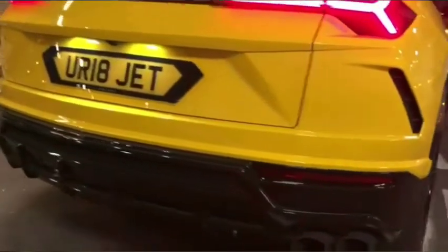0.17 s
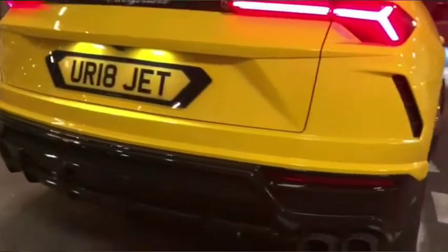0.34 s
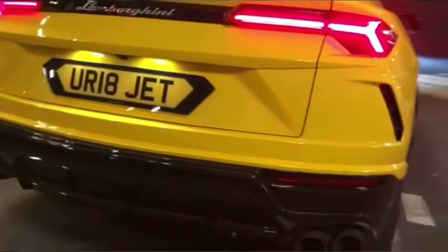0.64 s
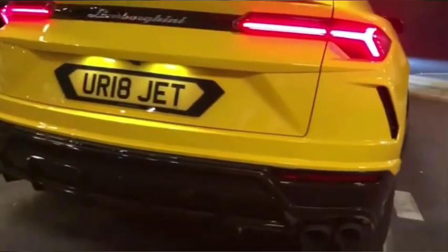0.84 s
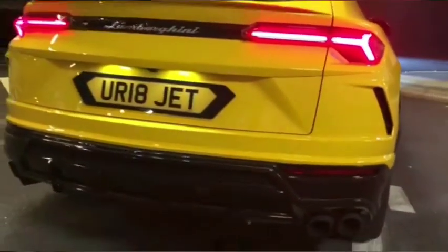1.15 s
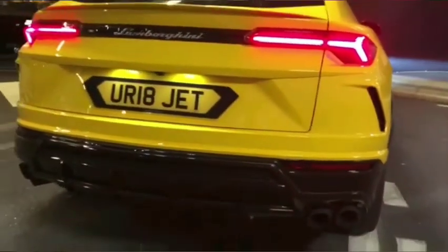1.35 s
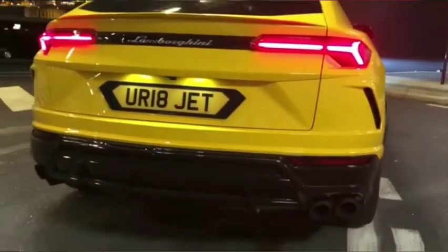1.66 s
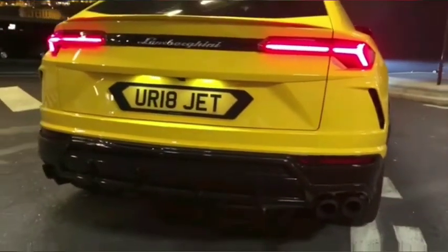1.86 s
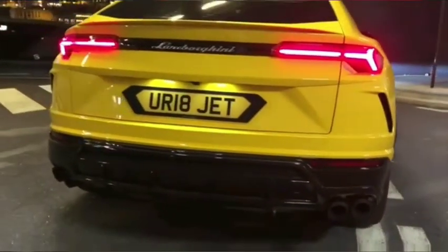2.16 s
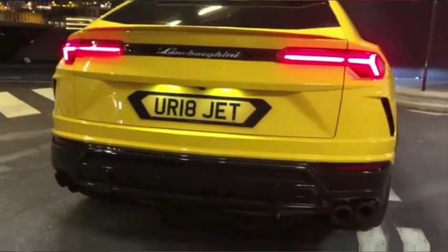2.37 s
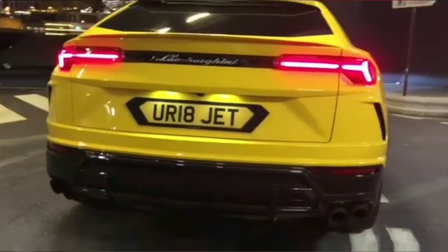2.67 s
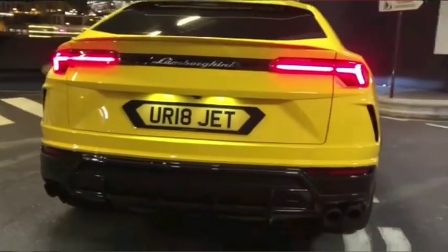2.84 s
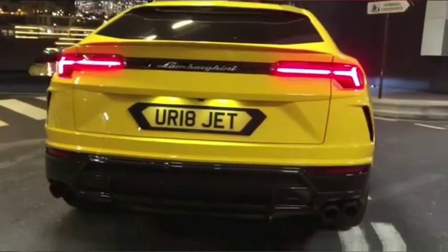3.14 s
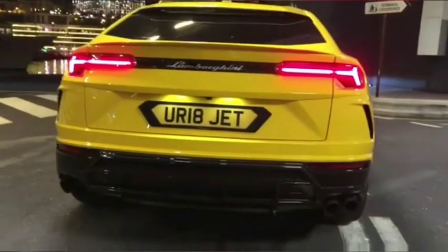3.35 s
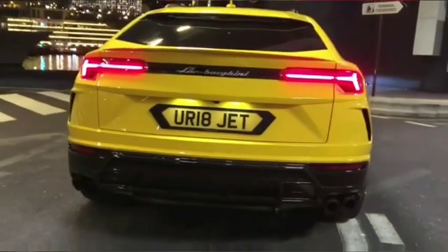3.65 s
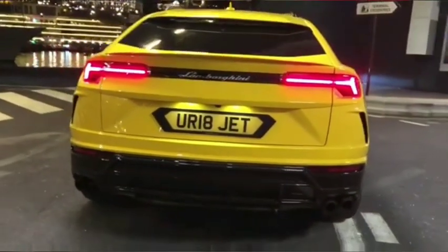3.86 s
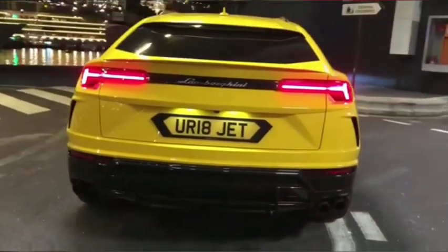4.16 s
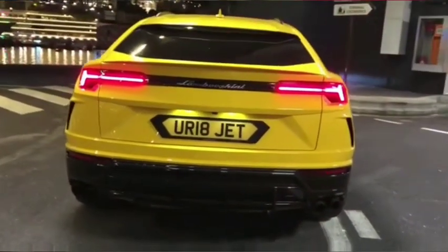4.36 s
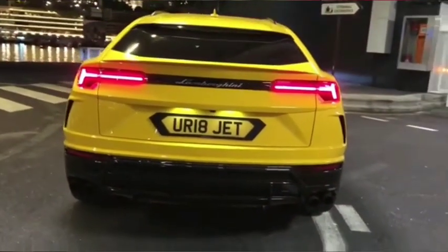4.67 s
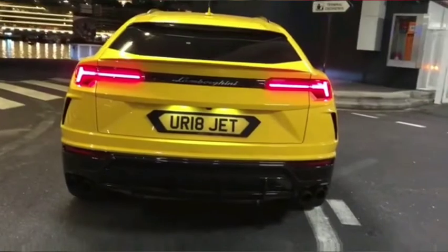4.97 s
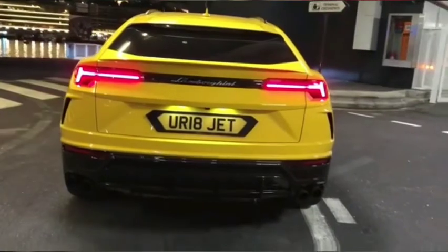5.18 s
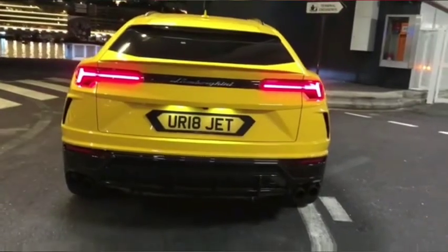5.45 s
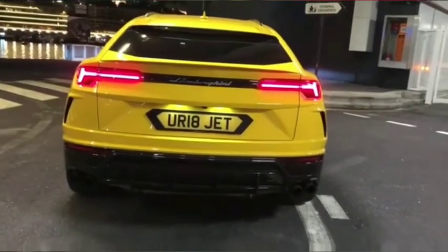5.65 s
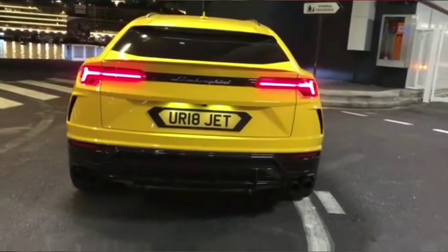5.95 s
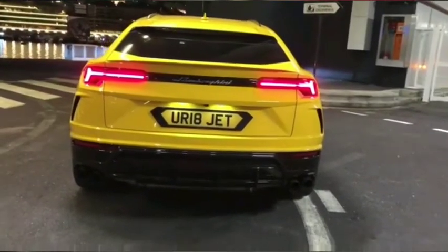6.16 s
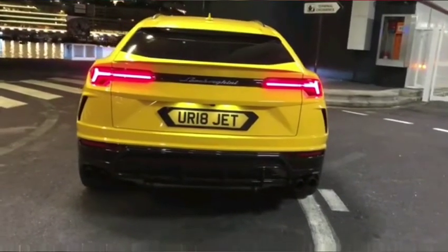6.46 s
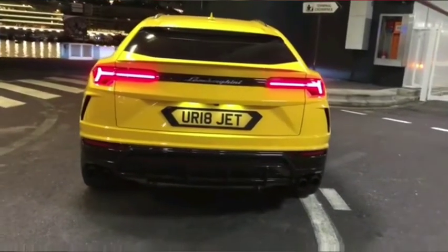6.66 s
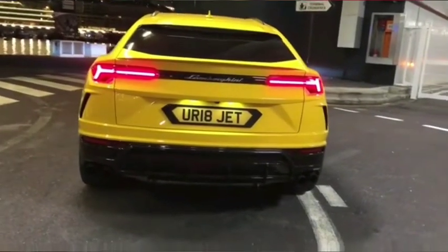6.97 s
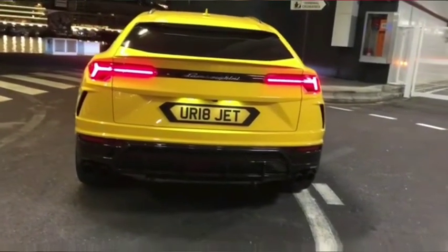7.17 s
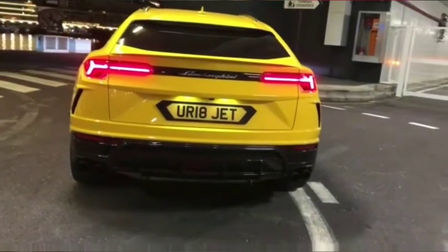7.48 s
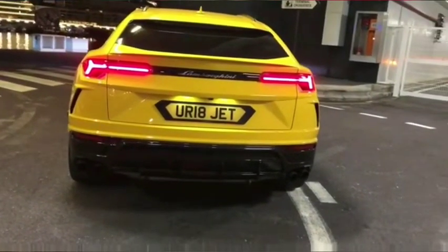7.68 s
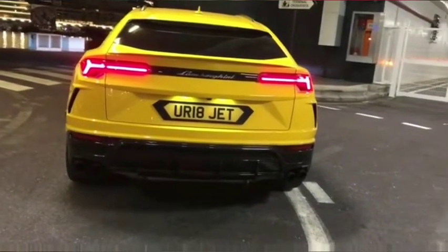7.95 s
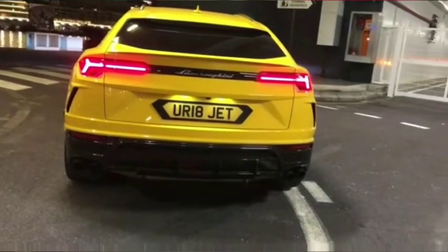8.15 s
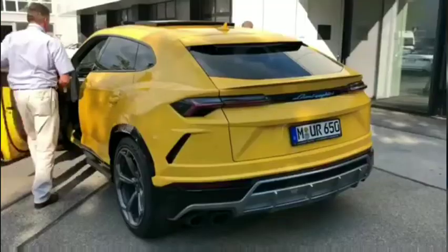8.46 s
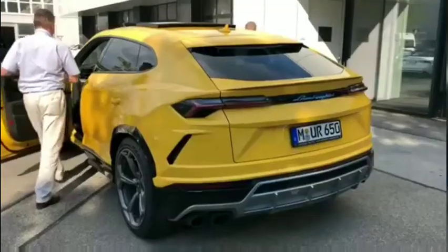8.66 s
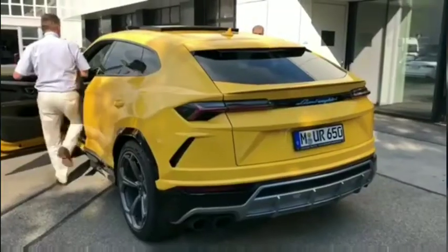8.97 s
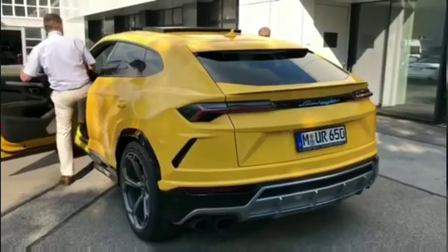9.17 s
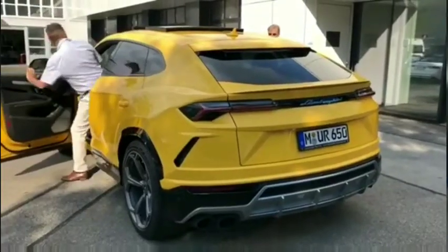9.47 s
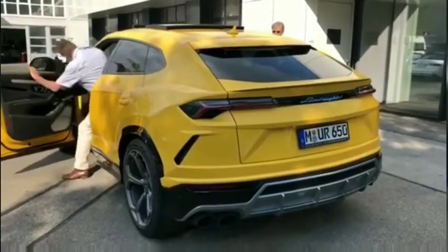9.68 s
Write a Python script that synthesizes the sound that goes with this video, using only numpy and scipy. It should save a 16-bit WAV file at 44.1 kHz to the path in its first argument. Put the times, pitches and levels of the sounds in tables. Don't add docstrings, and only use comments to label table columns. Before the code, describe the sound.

A V8 exhaust note falls from an earlier rev, then five short throttle blips growl upward, separated by burbling overruns. Backfires crackle densely after the first, third and fourth; the second ends in a sharp snap and a big airy blow-off. Nearby walls and road return short echoes to the close, overloaded microphone. Abrupt cut, brief gap, then soft distant traffic hum, light scuffs and faint cloth.

```python
import sys
import numpy as np
from scipy import signal
from scipy.fft import rfft, irfft
from scipy.io import wavfile
from scipy.ndimage import uniform_filter1d

SR = 44100
rng = np.random.default_rng(int(sys.argv[2]) if len(sys.argv) > 2 else 0)


def waveform_to_disk(signal):
    frames = np.transpose(np.atleast_2d(signal))
    scaled = np.clip(frames, -1, 1) * 32767
    samples = np.round(scaled).astype(np.int16)
    wavfile.write(sys.argv[1], SR, samples)


def invert_db(x):
    u = np.asarray(x, float) / 20
    return 10 ** u


N = 433062

# f/Hz, width/Hz, level/dB
TIP = [(1060, 151, 3), (1295, 217, -1.5)]
# f/Hz, width/Hz, level/dB
SILENCER = [(59.7, 16.7, 2), (107, 39.7, 0), (146.7, 44.4, 1.5), (210.5, 61.6, -1), (289, 46, -5.5),
            (346.3, 89, -11)]
# f/Hz, width/Hz, level/dB
PIPE = [(467, 120, -0.5), (655, 131, 1), (795, 156, -0.5)]
# f/Hz, width/Hz, level/dB
RIM = [(1470, 590, 2), (2210, 760, 1), (3320, 1020, -4.5), (4200, 1130, -14)]
# f/Hz, level/dB
BOOM = [(85, -2.5), (110, -0.5), (128, 1.5), (138, 4.5), (148, 3.5), (162, -2.5), (190, -7)]
# down t/s, up t/s, peak gas flow level/dB, firing tone level/dB, growl over flow level/dB
BLIPS = [
    (.875, 1.158, -18.5, -13.5, 3),
    (2.695, 3.057, -19.5, -13, -2.5),
    (4.422, 4.72, -28.5, -19.5, 0.5),
    (5.803, 6.126, -23, -16, -1),
    (7.857, 8.15, -22, -11.5, -8.5),
]
RELEASE_S = 0.12
VENT_FALL_DB_PER_S = -89.5


def evened(x):
    return x / np.sqrt(np.mean(x ** 2) + 1e-20)


def steady(x):
    return x / np.sqrt(abs(uniform_filter1d(x ** 2, 8192)) + 1e-12)


def read(points, hz):
    f, value = np.transpose(points)
    return np.interp(np.log(hz + 1), np.log(f + 1), value)


def moments():
    return np.arange(0, N, 32) / SR


def line(points):
    return np.interp(moments(), *np.transpose(sorted(points)))


def fine(control):
    return np.interp(np.arange(N) / SR, moments(), control)


def together(*levels_db):
    return 10 * np.log10(sum(invert_db(db) ** 2 for db in levels_db))


def waver(db, hz):
    steps = rng.standard_normal(400)
    return invert_db(db * np.interp(np.arange(N) / SR * hz, np.arange(len(steps)), steps))


def ring(x, modes):
    out = 0
    for k, (hz, width, db) in enumerate(modes):
        out = out + (-1) ** k * invert_db(db) * signal.lfilter(*signal.iirpeak(hz, hz / width, SR), x)
    return out


def focus(x, modes, hz, width):
    return ring(ring(x, modes), [(hz, width, 0)])


def noise(spectrum, patchy_db, flicker_db):
    frames, hz = N // 128 + 5, np.fft.rfftfreq(512, 1 / SR)
    a, b, patches = rng.standard_normal((frames, 257, 3)).T
    patches = uniform_filter1d(patches, size=8, axis=0)
    patches = evened(uniform_filter1d(patches, size=16, axis=1))
    flicker = evened(uniform_filter1d(rng.standard_normal(frames), size=5))
    level_db = read(spectrum, hz)[:, None] + patchy_db * patches + flicker_db * flicker
    z = (a + 1j * b) * invert_db(level_db)
    return evened(signal.istft(z, nperseg=512, noverlap=384)[1][:N])


def bursts(events, rise_s, t60_s):
    t = np.arange(4000) / SR
    out = np.zeros(N + len(t))
    for s, db, hz in events:
        shape = invert_db(db - 60 * t / t60_s) * np.minimum(t / rise_s, 1)
        spray = focus(rng.standard_normal(len(t)), [(hz, 900, 3), (9000, 8000, -2)], 5900, 9000)
        out[round(s * SR):][:len(t)] += 0.79 * shape * spray
    return out[:N]


def street():
    # f/Hz, level/dB per Hz
    hum_spectrum = [(15, -52), (25, -25), (71, 2.5), (234, -9), (273, -8.5), (437, -16), (1870, -20.5),
                    (3070, -32), (3500, -29), (3780, -34.5), (9390, -50.5), (10700, -53), (12500, -60),
                    (16200, -94), (22000, -120)]
    hz = np.fft.rfftfreq(N, 1 / SR)
    hum = evened(irfft(rfft(rng.standard_normal(N)) * invert_db(read(hum_spectrum, hz)), N))
    swell = evened(uniform_filter1d(rng.standard_normal(N), size=4000))
    return invert_db(-42.5) * invert_db(.7 * swell) * hum


def rustle():
    centre_s, width_s = 9.3, 0.47
    swell = np.exp(-((np.arange(N) / SR - centre_s) / width_s) ** 2)
    return invert_db(-64) * swell * noise([(2000, -30), (3500, 4), (7000, -6), (11000, -10)], 3.0, 2.5)


def scuffs():
    # t/s, level/dB, f/Hz
    steps = [
        (8.872, -46, 4300),
        (9.07, -56, 3600),
        (9.125, -49, 3480),
        (9.148, -42, 3610),
        (9.319, -42, 3510),
        (9.385, -48, 3590),
    ]
    return bursts(steps, rise_s=.006, t60_s=0.11)


def walls(x):
    # f/Hz, t60/s
    decay = [(60, 0.3), (300, 0.55), (1200, 0.29), (4000, 0.17), (14000, 0.42)]
    taps = np.zeros(SR // 2)
    at = np.arange(500, SR // 2 - 20, 20)
    taps[at + rng.integers(0, 20, len(at))] = rng.choice([-1., 1.], len(at))
    hz, t, z = signal.stft(taps, SR, nperseg=256)
    tail = signal.istft(z * invert_db(-60 * t / read(decay, hz)[:, None]), SR, nperseg=256)[1]
    return signal.fftconvolve(x, tail / np.linalg.norm(tail))[:N]


def hollow(x):
    # f/Hz, width/Hz, level/dB
    near_colour = [(465, 100, -1), (804, 140, -3), (235, 60, -6), (72, 40, -6)]
    fade_s = 4.6
    share = np.clip(0.71 * (1 - (np.arange(N) / SR / fade_s) ** 2), 0, 1)
    return x - share * ring(x, near_colour)


def ticks():
    # t/s, level/dB, f/Hz
    taps = [
        (2.29, -28.5, 6300),
        (2.302, -20, 4700),
        (3.1853, -16, 4070),
        (3.1995, -23, 3760),
        (3.208, -3, 3980),
        (4.102, -36, 4240),
        (5.0313, -29, 3560),
        (5.6001, -36, 3670),
        (6.5864, -17, 4200),
        (7.205, -24, 5700),
    ]
    # t/s, length/s, f/Hz, level/dB
    chirp = (3.192, .019, 3080, -15)
    out = bursts(taps, rise_s=0.0028, t60_s=0.034)
    s, length, hz, db = chirp
    t = np.arange(4000) / SR
    whistle = (t < length) * (t / length) ** 2 * np.sin(2 * np.pi * hz * t)
    out[round(s * SR):][:len(t)] += invert_db(db) * whistle
    return out


def backfires():
    # t/s, crack level/dB, thump level/dB, snap level/dB
    backfire_pops = [(1.221, -29, -36, -32.5), (1.304, 1, -17.5, -8), (1.31, -6, -4.5, -11), (1.333, -4, -10, -13),
                     (1.362, -8.5, -7.5, -16.5), (1.448, -4.5, -14, -19), (1.487, -5.5, -7.5, -11),
                     (1.524, -11.5, -7, -16), (1.613, -13, -15, -33.5), (1.631, -16, -5, -20),
                     (1.726, -34, -16, -22), (1.731, -4, -8.5, -35), (1.755, -16.5, -12, -38),
                     (1.777, -16, -10.5, -47), (1.869, -9, -9.5, -28.5), (1.95, -22, -11, -31.5),
                     (2.29, -23, -15, -36), (2.347, -17, -18, -35.5),
                     (2.706, -10.5, -13, -26),
        (3.139, -18, -25, -32),
        (3.211, -8, -34, -14),
        (3.374, -19.5, -16, -26),
        (3.529, -16, -16, -30),
        (3.676, -38, -19, -37),
                     (4.433, -27, -35, -50), (4.848, -14, -9, -14.5), (4.872, -6, -29, -31), (4.883, -6, -26, -42),
              (4.901, -18, -18, -38), (5.002, -10.5, -8.5, -23.5), (5.049, -11.5, -13, -30),
              (5.063, -13.5, -14, -38), (5.17, -8.5, -10, -23), (5.207, -13, -10.5, -31),
              (5.233, -15.5, -19, -45), (5.382, -11, -11.5, -26), (5.414, -31, -11, -37),
              (5.468, -10, -10, -26.5),
                     (5.798, -23, -19, -33), (6.264, -4, -13, -16), (6.296, -7.5, -20, -29),
              (6.317, -9.5, -5, -21.5), (6.353, -36, -14.5, -41), (6.401, -16, -12.5, -37),
              (6.427, -5, -7, -18), (6.481, -8.5, -9, -18.5), (6.508, -5, -21, -43), (6.556, -7, -6, -20),
              (6.589, -8.5, -7.5, -23.5), (6.621, -7.5, -15, -28), (6.653, -7.5, -14.5, -28.5),
              (6.696, -9.5, -6, -23), (6.756, -10, -3, -23), (6.78, -6.5, -12, -19), (7.394, -27, -41, -50),
              (7.493, -16.5, -24, -37), (7.547, -23, -20, -38),
                     (7.877, -14, -17, -31),
        (7.971, -13, -33, -38),
        (8.124, -3, -27, -33),
        (8.155, -9, -37, -28),
        (8.275, -9, -7, -24),
        (8.29, -5.5, -13, -26.5),
    ]
    # t/s, thump level/dB
    thuds = [
        (2.45, -17.5),
        (3.085, -9.5),
        (3.43, -20),
        (3.77, -22.5),
        (4.21, -30),
        (7.6, -23),
    ]
    muffled = [(at, db - 18, db, db - 34.5) for at, db in thuds]
    pops = backfire_pops + muffled
    s, crack_db, thump_db, snap_db = np.transpose(pops)
    fizz_db = -29 + 0.49 * snap_db

    t = np.arange(4500) / SR
    a, b, c, d = rng.standard_normal((len(s), 4, len(t))).transpose(1, 0, 2)
    ragged = invert_db(3.6 * evened(uniform_filter1d(d, size=130)))
    shock = a * (invert_db(-60 * t / 0.011) + 0.24 * ragged * invert_db(-60 * t / 0.13))
    crack = focus(shock, TIP, 1200, 1500) - invert_db(-3.5) * focus(shock, PIPE, 590, 1040)
    snap = ring(c * (invert_db(-60 * t / 0.025) + 0.16 * ragged * invert_db(-60 * t / 0.092)), RIM)
    pulse = (1 - t / 0.0038) * np.exp(-t / 0.0022)
    blow = pulse + .5 * uniform_filter1d(b, size=30) * invert_db(-60 * t / 0.6)
    thump = ring(blow, SILENCER) * invert_db(-60 * t / 0.17)
    hiss = np.diff(d, prepend=0) * (invert_db(-60 * t / 0.068) + .2 * invert_db(-60 * t / 0.16))
    fizz = ring(hiss, [(6660, 2500, 0)])

    layers = ((crack_db, crack), (thump_db + 6.5, thump), (fizz_db + 4, fizz), (snap_db + 5.0, snap))
    bangs = sum(invert_db(db)[:, None] * x / abs(x).max(axis=1, keepdims=True) for db, x in layers)
    out = np.zeros(N + len(t))
    for at, bang in zip(s, bangs):
        out[round(at * SR):][:len(t)] += bang
    return out[:N]


def throttle():
    t = np.arange(N) / SR
    opened = sum((t > down) & (t < up + RELEASE_S) for down, up, *_ in BLIPS)
    return .15 + .85 * uniform_filter1d(opened * 1., size=1500)


def vent(s, db, fall_db_per_s):
    since = moments() - s - 0.05
    return db + np.maximum(np.where(since < 0, 250, fall_db_per_s) * since, -90)


def pedal():
    jump_s, build_s, shut, boost_db, coast_growl_db = 0.05, 0.25, -80, 3, 0
    stab, tone, lump, boost, growl = [], [], [], [], []
    for down, up, peak, tone_db, growl_db in BLIPS:
        end, leapt, built = up + RELEASE_S, down + jump_s, down + build_s
        thud = .6 * (peak + 22)
        stab += [(down - .02, shut), (down, peak - 18), (leapt, peak - 8), (built, peak), (up, peak - 1),
                 (end, peak - 16), (end + .03, shut)]
        tone += [(down - .02, shut), (down, tone_db - 5), (leapt, tone_db - 3), (down + 0.21, tone_db),
                 (up + 0.046, tone_db), (up + 0.048, tone_db - 5.5), (end + 0.022, tone_db - 8.5),
                 (end + 0.097, shut)]
        lump += [(down - .02, shut), (down, thud), (up - .09, thud), (up, thud + 10.5), (end, thud - 1),
                 (end + .03, shut)]
        boost += [(down, 0), (leapt, -boost_db), (built, boost_db), (up + .02, -1), (end, 0)]
        growl += [(down, coast_growl_db), (leapt, growl_db - 7), (built, growl_db), (up, growl_db),
                  (end + 0.024, coast_growl_db)]
    return map(line, (stab, tone, lump, boost, growl))


def overrun():
    # start t/s, gas flow level/dB, calm from t/s, calm flow level/dB, unburnt fuel level/dB
    shut = [
        (0.0, -31.5, 0.49, -35.5, 11.5),
        (1.3, -27.5, 2.49, -40, 15.5),
        (3.5, -35, 3.88, -43.5, 11),
        (4.86, -34, 5.5, -39.5, 16.5),
        (6.28, -26, 7.03, -37.5, 15.5),
    ]
    coast, fuel = [], []
    for (start, flow_db, calm, calm_db, fuel_db), (down, *_) in zip(shut, BLIPS):
        coast += [(start - .03, flow_db - 7.5), (start, flow_db), (calm, calm_db),
                  (down, calm_db - 5 * (down - calm))]
        fuel += [(start, fuel_db - 1.5), (start + 0.17, fuel_db), (calm, fuel_db), (down, fuel_db + 3.5)]
    return line(coast), line(fuel)


def levels(hz):
    # t/s, level/dB
    puffs = [
        (1.33, -36),
        (2.275, -41.5),
        (2.4, -53),
        (3.7, -51.5),
        (5.77, -44),
        (8.25, -32.5),
    ]
    # t/s, level/dB
    surges = [
        (.93, -16),
        (1.6, -7.5),
        (2.69, -14),
        (3.1, -16),
        (4.86, -20.5),
        (5.8, -14),
        (6.72, -13.5),
        (6.95, -19),
    ]
    stab, tone, lump, boost, growl = pedal()
    coast, fuel = overrun()
    off = 3.222
    blow = vent(off, -25.5, VENT_FALL_DB_PER_S)
    lost = line([(off, 0), (off + .15, -6), (off + 1.154, -6), (off + 1.2, 0)])
    stall = line([(off - .02, 0), (off, -11.5), (off + .1, -11.5), (off + .14, 0)])
    flow = together(stab, coast)
    boom = read(BOOM, hz)
    swells = [vent(*row, -71.5) for row in surges]
    sighs = [vent(*row, VENT_FALL_DB_PER_S) for row in puffs]
    tone_db = together(tone + 0.13 * boom, coast + lost + 10.5 + boom, *swells) + 2 * stall
    rasp_db = together(flow, blow - .5)
    burble_db = together(lump - 26, coast + fuel) + stall
    rush_db = together(flow - 15.5 + boost, blow, *sighs)
    growl_db = together(flow + growl, blow - 5)
    return tone_db, rasp_db, burble_db, rush_db, growl_db


def firings(turns, uneven_db):
    cylinder_db = [-11.5, -3, -14.5, -3.5, -9, -10.5, 0, -7]
    at = np.flatnonzero(np.diff(np.floor(turns), prepend=0))
    chance = rng.standard_normal(4000)[:len(at)]
    clicks = np.zeros(N)
    clicks[at] = invert_db(np.resize(cylinder_db, len(at)) + uneven_db[at] * chance)
    return clicks


def firing_tone(hz, turns, load):
    # multiple of the firing rate, level/dB
    orders = [(.5, -15), (.75, -10), (.875, -17), (1.75, -16), (2, -13), (2.75, -23), (3, -14.5),
              (3.25, -20), (3.5, -21), (4, -25), (4.5, -24), (5, -24)]
    tone = waver(1.4, 14) * np.sin(2 * np.pi * turns)
    for k, db in orders:
        reach = np.clip((k * hz - 265) / 70, .1, 1.3) ** (k > 1)
        level = invert_db(db + (k < 1) * read(BOOM, k * hz))
        wave = np.sin(2 * np.pi * (k * turns + rng.random()))
        tone += np.maximum(load, .3) * reach * waver(1.7, 14) * level * wave
    return np.sqrt(2) * tone


def engine():
    # t/s, firing rate f/Hz
    revs = [
        [(0.0, 164.8), (0.32, 139.5), (0.56, 111.2), (0.76, 95.5), (0.87, 102.7)],
        [(0.97, 146.4), (1.02, 163.2), (1.11, 179.4), (1.34, 189.7), (1.6, 146.5), (1.9, 119.2), (2.06, 117.4),
         (2.36, 93.4), (2.68, 79.35)],
        [(2.74, 103.5), (2.9, 165.3), (2.95, 184.5), (3.06, 197.5), (3.2, 185), (3.55, 148), (3.78, 123.1),
         (4.1, 102.6), (4.4, 87)],
        [(4.47, 113.2), (4.56, 148.2), (4.61, 163.5), (4.7, 173.1), (4.89, 161), (5.05, 141.5), (5.35, 125),
         (5.65, 102.4), (5.78, 93.2)],
        [(5.84, 110), (5.98, 172.1), (6.05, 199.7), (6.14, 205.6), (6.4, 186.6), (6.7, 168), (6.84, 139.2),
         (7.14, 125), (7.8, 86)],
        [(7.9, 110.2), (8.02, 148.4), (8.06, 161.1), (8.11, 168.8), (8.32, 167.4)],
    ]
    # f/Hz, level/dB per Hz
    rush_spectrum = [(880, -33.5), (1500, -13), (1560, -3), (2700, -2.5), (4230, -5.5), (4510, -3.5),
                     (10200, -14), (14000, -23.5)]
    hz = uniform_filter1d(line(sum(revs, [])), size=38)
    hz, tone_db, rasp_db, burble_db, rush_db, growl_db = map(fine, (hz, *levels(hz)))
    turns = np.cumsum(hz) / SR
    load = throttle() * invert_db(np.clip(0.54 * (growl_db + 29), -9, 0))
    tone = firing_tone(hz, turns, load)

    clicks = firings(turns, 4.5 - 2.2 * load)
    hang = np.exp(-np.arange(900) / SR / 0.002)
    puffs = signal.oaconvolve(clicks, hang)[:N]
    gas = (puffs + 0.98) * rng.standard_normal(N) + 9 * clicks
    rasp = focus(gas, TIP, 1200, 1500) - invert_db(-14) * ring(gas, RIM)
    growl = -focus(gas + 9 * load * clicks, PIPE, 670, 920)
    lumps = firings(turns, 6.5 - 2.4 * load) + 0.12 * rng.standard_normal(N)
    burble = focus(lumps, SILENCER, 131, 390)
    rush = noise(rush_spectrum, 2.5, 1.15) * (1 + 0.17 * puffs)
    layers = ((rasp_db, rasp), (growl_db - 0.5, growl), (burble_db - 4, burble), (rush_db, rush))
    return invert_db(tone_db - 2.0) * tone + sum(invert_db(db) * steady(x) for db, x in layers)


def scene():
    cut_s, street_s = 8.307, 8.398
    t = np.arange(N) / SR
    bangs = backfires()
    night = hollow(engine() + bangs + invert_db(-5) * walls(bangs)) + ticks()
    night = signal.lfilter(*signal.butter(2, 45, "high", fs=SR), night)
    band = signal.firwin(301, 11800, window=("kaiser", 7), fs=SR)
    day = signal.oaconvolve(street() + scuffs() + rustle(), band, "same")
    night_gate = np.clip((cut_s - t) / 0.00098, 0, 1)
    day_gate = np.clip((t - street_s) / 0.0039, 0, 1)
    return (night * night_gate + day * day_gate)[None]


def roll_off(x):
    return signal.sosfilt(signal.butter(12, 14120, fs=SR, output="sos"), x)


def record(dry):
    x = dry / (1 + abs(dry / .69) ** 10) ** (1 / 10)
    band = signal.firwin(201, 14000, window=("kaiser", 3), fs=SR)
    x = signal.oaconvolve(x, band[None], "same")
    return roll_off(x)


dry = scene()
out = record(dry)
waveform_to_disk(out)
```